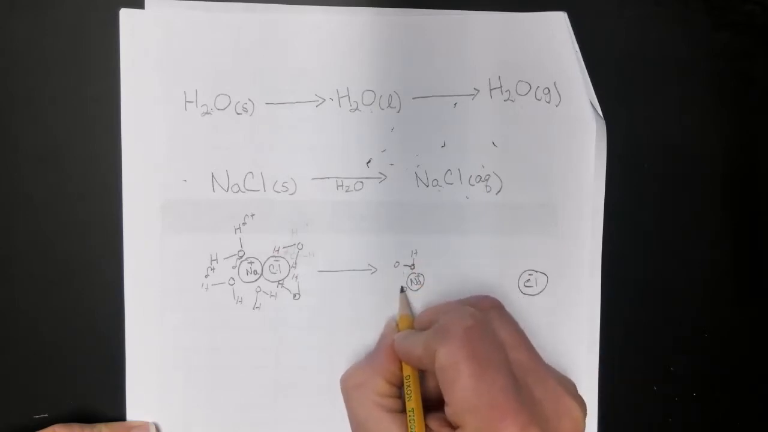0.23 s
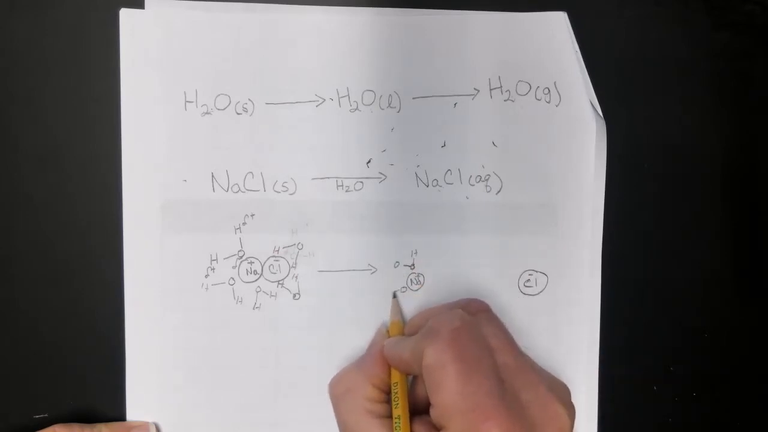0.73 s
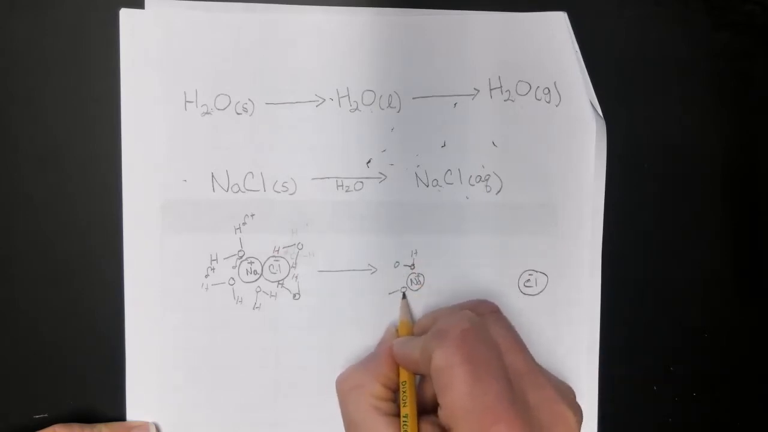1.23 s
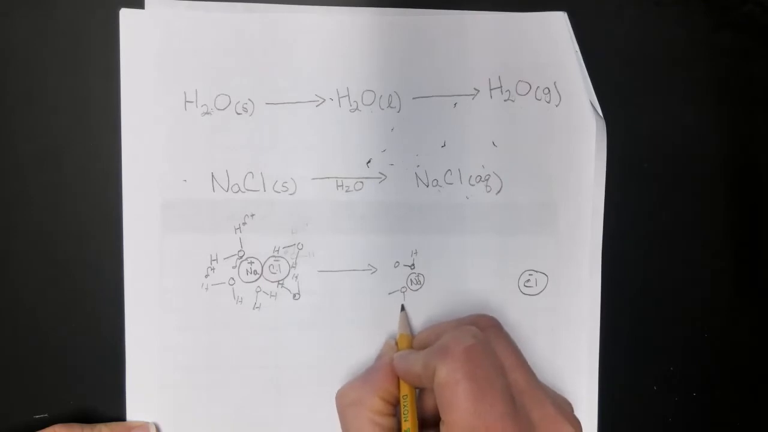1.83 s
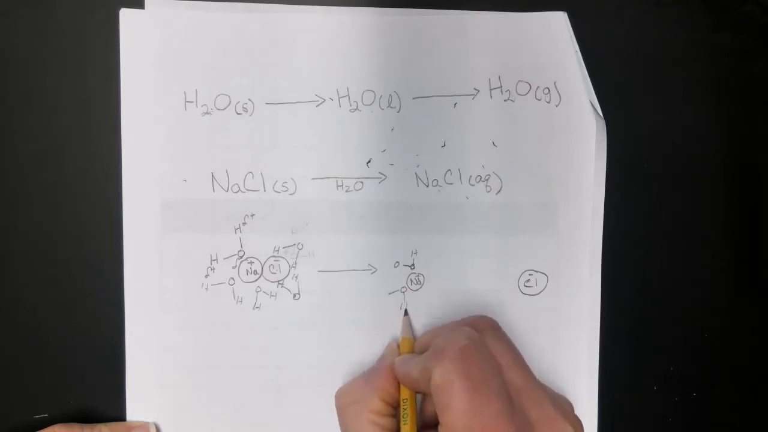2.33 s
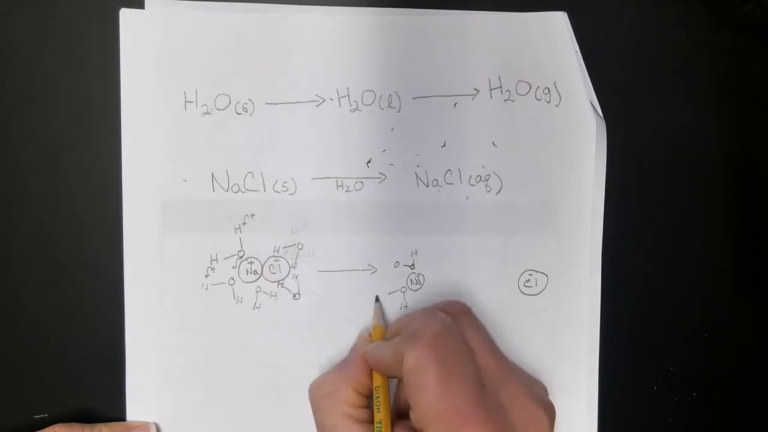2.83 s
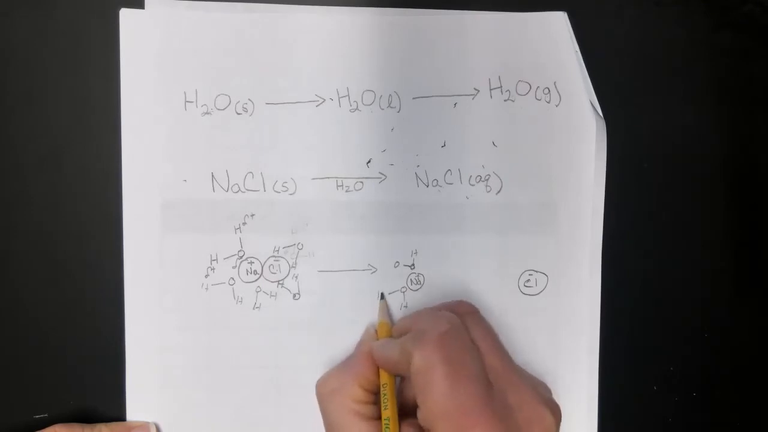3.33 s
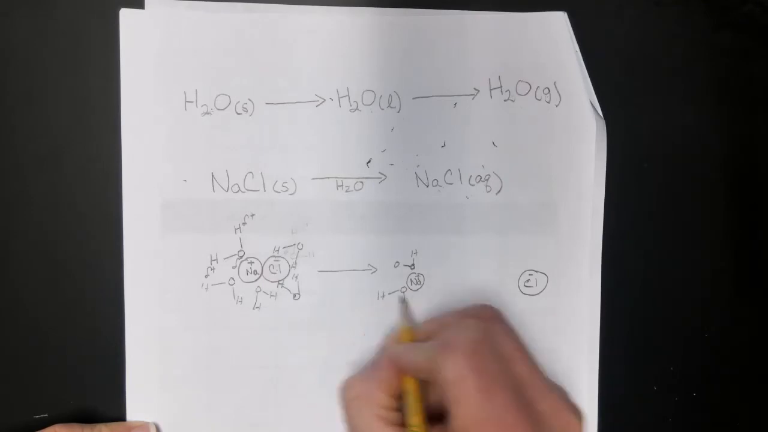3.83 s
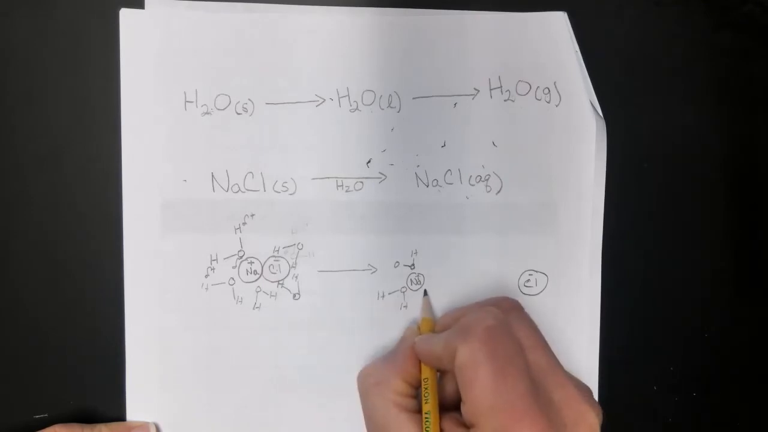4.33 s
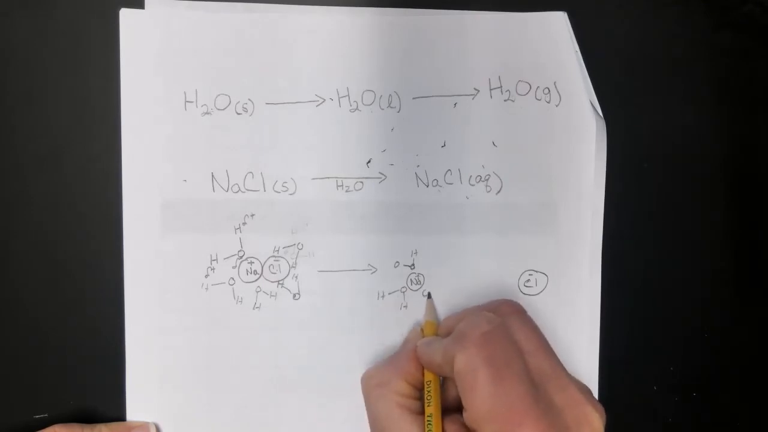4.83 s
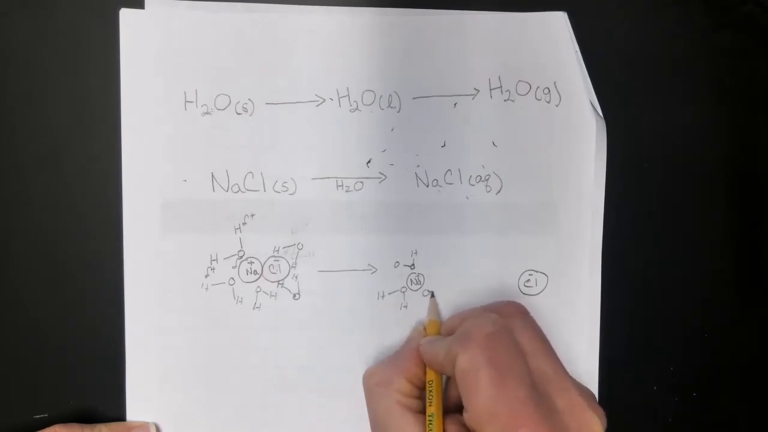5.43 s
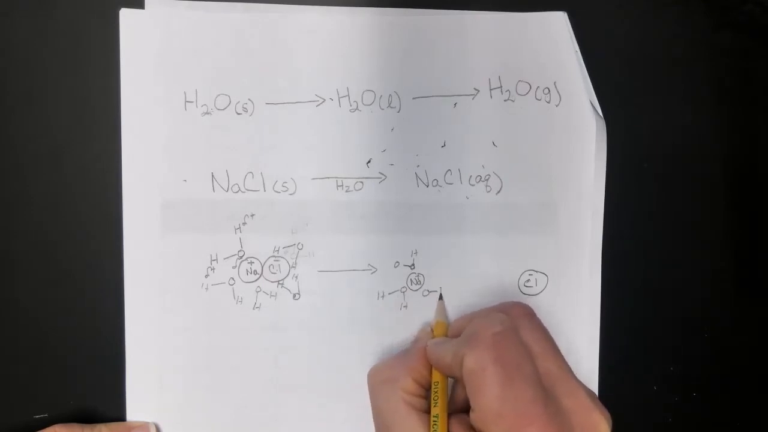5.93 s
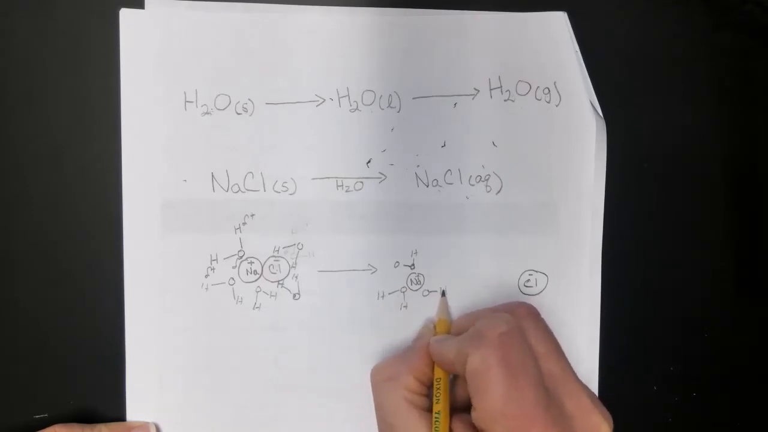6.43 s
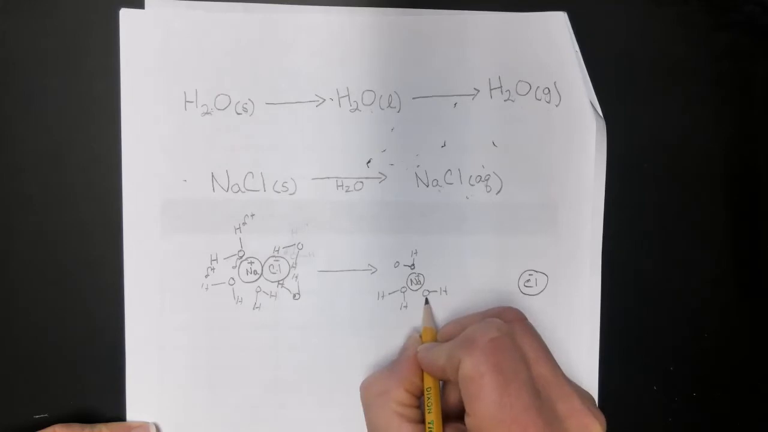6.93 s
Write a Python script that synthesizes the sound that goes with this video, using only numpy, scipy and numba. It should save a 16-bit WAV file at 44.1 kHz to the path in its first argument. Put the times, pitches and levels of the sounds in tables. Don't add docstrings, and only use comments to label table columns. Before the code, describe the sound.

A pencil writes on paper lying on a desk: brief, high, lightly squeaky scratches in uneven groups with pauses, small dry ticks as the tip lands. Two louder raspy drags come near the middle, then lighter strokes follow. A low ventilation hum runs throughout under soft hiss. Close small camera microphone, dull at the top, with momentary thin dropouts.

```python
import sys
import numpy as np
from scipy import signal
from scipy.fft import rfft, irfft
from scipy.io import wavfile
from scipy.ndimage import uniform_filter1d
from numba import njit

SR = 44100
rng = np.random.default_rng(int(sys.argv[2]) if len(sys.argv) > 2 else 0)


def wrap_up_sound(samples):
    columns = np.atleast_2d(samples).T
    tamed = np.clip(columns, -1, 1)
    steps = np.round(tamed * 32767).astype(np.int16)
    wavfile.write(sys.argv[1], SR, steps)


def volts_from_decibels(level):
    exponent = np.asarray(level, float) / 20
    return 10 ** exponent


N = 316197


@njit
def svf(x, hz, width):
    y = np.empty(len(x))
    band, low = 0., 0.
    for i in range(len(x)):
        g = np.tan(np.pi * hz[i] / SR)
        damping = width[i] / hz[i]
        v = (band + g * (x[i] - low)) / (1 + g * (g + damping))
        band = 2 * v - band
        low = low + 2 * g * v
        y[i] = damping * v
    return y


def ring(x, hz, width_hz):
    hz, width_hz = hz + np.zeros(N), width_hz + np.zeros(N)
    once = svf(x, hz, width_hz)
    y = svf(once, hz, width_hz) / np.sqrt(width_hz)
    return y / np.std(y)


def walk(rate_hz):
    hold = int(SR / rate_hz)
    steps = np.repeat(rng.standard_normal(N // hold + 1), hold)
    return uniform_filter1d(uniform_filter1d(steps, hold), hold)[:N]


def coloured(spectrum, db, modes=()):
    hz = np.arange(N // 2 + 1) * SR / N + 1e-3
    points = np.array(spectrum)
    shape_db = np.interp(np.log(hz), np.log(points[:, 0]), points[:, 1], left=-120, right=-120)
    for centre_hz, width_hz, peak_db in modes:
        shape_db = shape_db + peak_db / (1 + (2 * (hz - centre_hz) / width_hz) ** 2)
    y = irfft(rfft(rng.standard_normal(N)) * volts_from_decibels(shape_db), N)
    return volts_from_decibels(db) * y / np.std(y)


def pencil(catch_rate_hz=11000, spread_db=2.5, grip_db=0.3, split_hz=222):
    force, (rough_db, sheet_db, desk_db, squeak_hz) = hand()
    chance, sign, strength = rng.random((3, N))
    catches = (chance < catch_rate_hz / SR) * np.sign(sign - .5)
    catches = catches * volts_from_decibels(-spread_db * np.log(strength + 1e-9))
    catches = catches * volts_from_decibels(grip_db * walk(60))
    squeak_hz = np.clip(squeak_hz, 4500, 7500)
    damping_hz = np.clip(480 + 2600 * volts_from_decibels(rough_db), 300, 3000)
    lower = ring(catches, squeak_hz - split_hz, damping_hz)
    upper = ring(catches, squeak_hz + split_hz, damping_hz)
    squeak = 0.71 * (lower - upper)
    rasp = ring(np.roll(catches, shift=700), 5500, 10000)
    sheet = ring(catches, 4030, 520) + volts_from_decibels(-6) * ring(catches, 3150, 360)
    sheet = sheet + volts_from_decibels(-2) * ring(catches, 7120, 380) + volts_from_decibels(-9) * ring(catches, 5450, 380)
    desk = ring(np.roll(catches, shift=1500), 2050, 1200)
    body = volts_from_decibels(sheet_db - 3.5) * sheet + volts_from_decibels(desk_db - 2.0) * desk
    return force * (squeak + volts_from_decibels(rough_db + 7.0) * rasp + body)


def hand():
    # middle_s, length_s, squeak_db, rough_db, squeak_hz
    glides = [(.038, .13, -63.5, -10, 5950), (.2, 0.18, -66, -8.5, 6230), (.703, 0.044, -62.5, -11.5, 6200),
              (.787, 0.092, -68.5, -7.5, 6100), (1.153, .14, -61.5, -21, 6030),
              (1.853, .12, -64.5, -19, 6150), (2.182, .12, -62.5, -24.5, 6060),
              (3.022, .14, -62, -20, 6100), (3.118, 0.036, -66.5, -11, 6340), (3.37, .14, -63, -20.5, 6130),
              (4.44, .07, -70, -15.5, 5950), (4.58, .24, -69, -15, 5980), (4.775, .16, -65, -10.5, 5980),
              (4.9, .09, -68, -8.5, 6440), (5.803, .12, -64.5, -11.5, 6020), (6.157, .14, -62.5, -13, 5900),
              (6.985, .14, -60.5, -15.5, 5970)]
    curls = [
        (.615, 0.14, -60, -18, 6140),
        (2.43, .075, -64, -9, 6050),
        (3.615, .09, -61.5, -9, 6200),
        (4.668, 0.13, -67.5, -4, 6130),
        (5.34, .06, -61, -8, 5730),
        (6.422, 0.079, -63.5, -7.5, 5780),
    ]
    drags = [
        (1.303, 0.21, -60, -9.5, 6680),
        (2.602, .21, -54.5, -8.5, 6380),
        (3.745, 0.23, -54.5, -5.5, 6540),
        (5.383, .07, -63.5, -4.5, 5910),
        (7.14, 0.16, -59, -8, 6410),
    ]
    # strokes, sheet_db, desk_db, sharpness of the speed bell (exponent), early peak -1..1
    kinds = ((glides, -7.5, -8, 1.44, 0.12),
             (curls, -1.5, -6, 1.7, 0.03),
             (drags, -8.5, -10.5, 1.6, -0.04))
    desk_per_rough = 0.31
    t = np.arange(N) / SR
    speed, colour = np.full(N, 1e-9), np.zeros((4, N))
    for strokes, sheet_db, desk_db, sharpness, early in kinds:
        for middle_s, length_s, squeak_db, rough_db, squeak_hz in strokes:
            u = np.clip((t - middle_s) / length_s, -.5, .5)
            arch = np.cos(np.pi * (u + early * (.25 - u ** 2))).clip(0)
            bell = volts_from_decibels(squeak_db) * arch ** sharpness * (abs(u) < .5)
            stroke_desk_db = desk_db + desk_per_rough * (rough_db + 11)
            speed = speed + bell
            colour = colour + bell * np.array([[rough_db], [sheet_db], [stroke_desk_db], [squeak_hz]])
    return speed, colour / speed


def ticks(ring_s=0.00058, snap_s=.0015, bounce_s=0.0031, bounce_db=0.0):
    # start_s, peak_db, ring_hz
    landings = [(0.624, -43, 4270), (0.6968, -61, 4280), (2.098, -52, 3980), (2.371, -47, 4020),
                (3.1844, -55, 4200), (3.27, -48.5, 3990), (3.569, -43.5, 3900), (5.3263, -54, 3090),
                (6.3748, -48, 4150), (6.5954, -58, 4100), (7.0794, -60, 3870)]
    out, t = np.zeros(N + 600), np.arange(600) / SR
    noise = rng.standard_normal((len(landings), 600))
    for (start_s, peak_db, ring_hz), crack in zip(landings, noise):
        tone = np.sin(2 * np.pi * ring_hz * t) * np.exp(-t / ring_s)
        snap = np.diff(crack, prepend=0) * np.exp(-t / snap_s)
        hit = 0.86 * tone + 0.45 * snap
        bounce = volts_from_decibels(bounce_db) * np.roll(hit, int(bounce_s * SR))
        i = int(start_s * SR)
        out[i:i + 600] += volts_from_decibels(peak_db) * (hit + bounce)
    return out[:N]


def room():
    # pitch_hz, level_db (per Hz)
    hum_spectrum = [(2.4, -29.5), (4.0, 2), (16, 3), (22, 1.5), (37, -9), (152, -13.5), (181, -19.5),
                    (215, -16.5), (298, -24.5), (413, -27), (468, -27.5), (518, -26.5), (1600, -49.5),
                    (2080, -87), (3520, -120)]
    # centre_hz, width_hz, peak_db
    standing_waves = [(61, 10, 1), (125, 16, 3.5), (141.5, 14.9, 6.5), (166.6, 8.2, 6.5), (216.7, 7.3, 5),
                      (222, 14, 1), (260.5, 28, 4), (328, 27, 4.5), (418.4, 22, 7.5), (531, 51, -3.5)]
    # pitch_hz, level_db (per Hz)
    hiss_spectrum = [(760, -23), (1300, -8.5), (2230, -7), (2580, -8.5), (3910, -9.5), (4270, -9.5),
                     (6960, -8.5), (7430, -5), (7600, -33), (9880, -61), (16700, -120)]
    hum = volts_from_decibels(0.28 * walk(2.3)) * coloured(hum_spectrum, -40.5, standing_waves)
    hiss = volts_from_decibels(.5 * walk(13)) * coloured(hiss_spectrum, -68.5)
    return hum + hiss


def scene():
    return (pencil() + ticks() + room())[None]


def dropouts(x, line_db=-3.0, left=0.0089):
    # middle_s, low_hz, high_hz, whistle_hz, second_whistle_hz (0 = none)
    gaps = [(.1335, 1000, 5950, 2205, 5118), (.2366, 1000, 5600, 1591, 3386), (.834, 1500, 5950, 2189, 0),
            (.8945, 1300, 6100, 4205, 0), (1.304, 1000, 5800, 3044, 0), (1.5165, 1000, 6000, 1422, 0),
            (1.6224, 1200, 6100, 0, 0), (2.178, 1100, 5500, 1, -2), (2.242, 1300, 5960, 3165, 0),
            (2.3484, 1000, 6000, 1321, 0), (2.9883, 900, 5400, 0, 0), (3.799, 900, 5500, 4139, 5101),
            (4.3958, 900, 6300, 0, 0), (4.909, 1150, 6200, 4189, 0), (5.2288, 1000, 6060, 1385, 1793),
            (5.7607, 1100, 6000, 2427, 5542), (6.1463, 890, 5230, 1716, 0), (6.3158, 1260, 5950, 0, 0)]
    long_gaps_s = (.1335, .8945)
    half = int(1024 / 48000 * SR)
    n = np.arange(-2 * half, 2 * half)
    hz = np.arange(2 * half + 1) * SR / len(n)
    out = x.copy()
    for middle_s, low_hz, high_hz, *whistles_hz in gaps:
        is_long = min(abs(middle_s - g) for g in long_gaps_s) < .01
        empty_ms = 9 if is_long else .6
        at, hold = int(middle_s * SR) + n, empty_ms * SR / 2000
        away = np.pi / 2 * np.clip((np.abs(n) - hold) / (half - 2 * hold), 0, 1)
        spectrum = rfft(x[at] * signal.windows.tukey(len(n), .5))
        middle = irfft(spectrum * ((hz > low_hz) & (hz < high_hz)), len(n))
        whistles = sum(np.sin(2 * np.pi * f * n / SR) for f in whistles_hz)
        out[at] += volts_from_decibels(line_db) * np.std(middle) * np.cos(away) * whistles
        out[at] -= (1 - left) * (1 - np.sin(away)) * middle
    return out


def roll_off(x):
    return signal.sosfilt(signal.butter(12, 15700, fs=SR, output="sos"), x)


def record(dry):
    low_pass = signal.ellip(10, .5, 60, 7220, fs=SR, output="sos")
    x = signal.sosfilt(low_pass, dry[0])
    edge = signal.ellip(6, 1, 50, (7200, 7560), "band", fs=SR, output="sos")
    x = x + volts_from_decibels(-32) * signal.sosfilt(edge, dry[0])
    busy = uniform_filter1d(np.diff(x, prepend=0) ** 2, size=2048) / volts_from_decibels(-57) ** 2
    above = signal.ellip(5, 1, 9, 8250, "high", fs=SR, output="sos")
    grit = signal.sosfilt(above, rng.standard_normal(N))
    grit = volts_from_decibels(-92.5 + 1.3 * walk(30)) * grit / np.sqrt(1 + busy)
    offset = -.0102
    x = dropouts(x) + offset + grit
    x = x * np.clip(np.arange(N, 0, -1) / 60, 0, 1)
    return roll_off(x[None])


dry = scene()
out = record(dry)
wrap_up_sound(out)
```